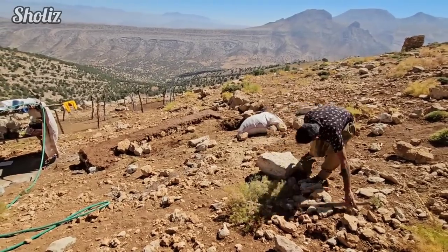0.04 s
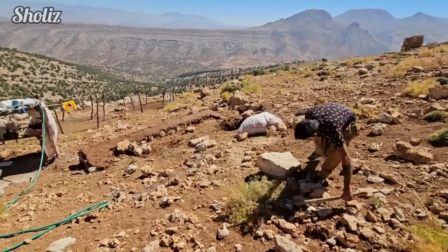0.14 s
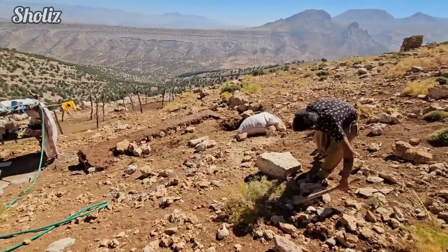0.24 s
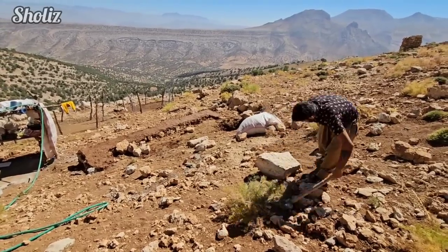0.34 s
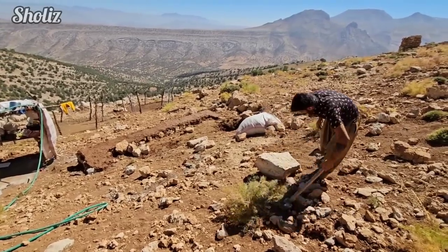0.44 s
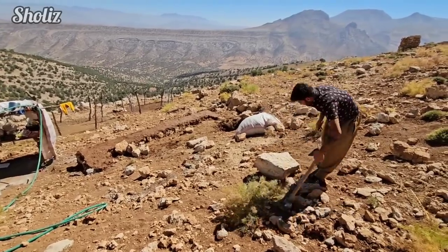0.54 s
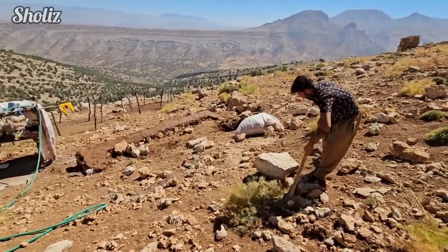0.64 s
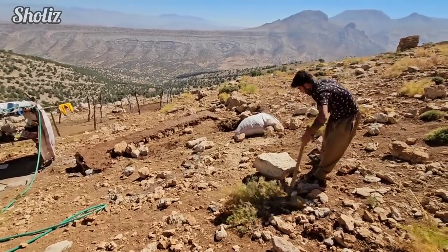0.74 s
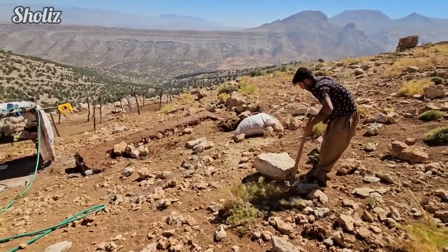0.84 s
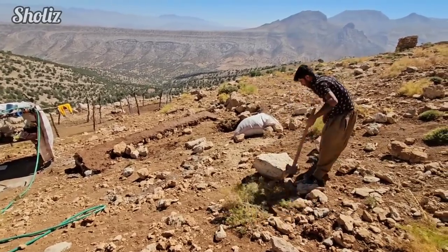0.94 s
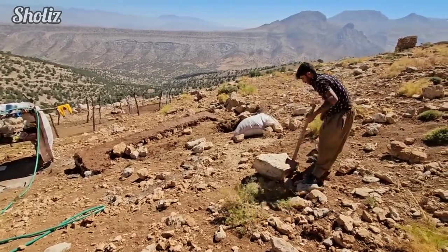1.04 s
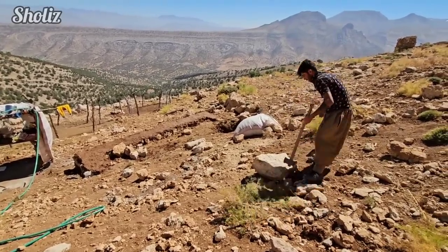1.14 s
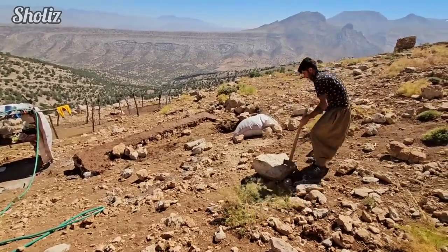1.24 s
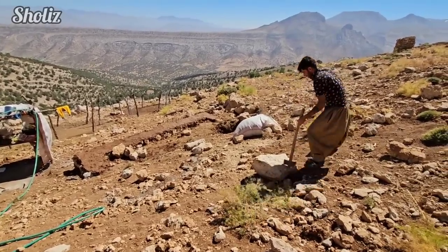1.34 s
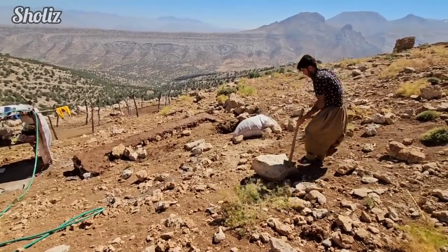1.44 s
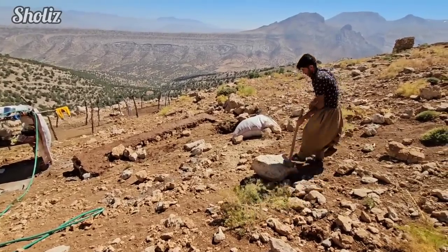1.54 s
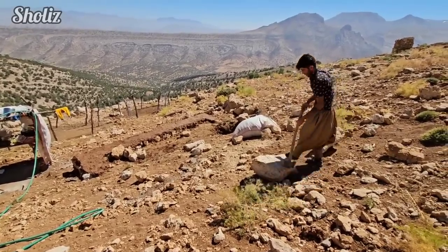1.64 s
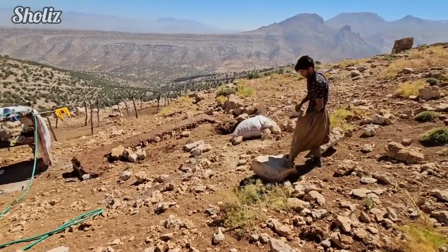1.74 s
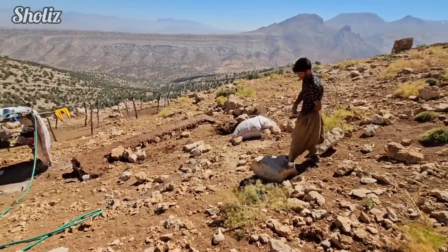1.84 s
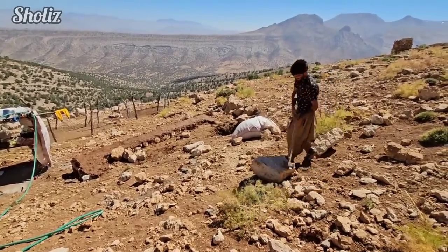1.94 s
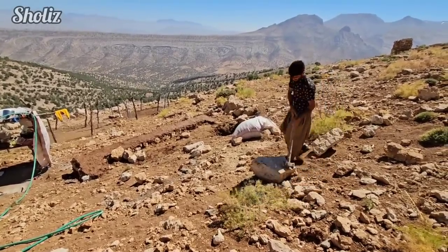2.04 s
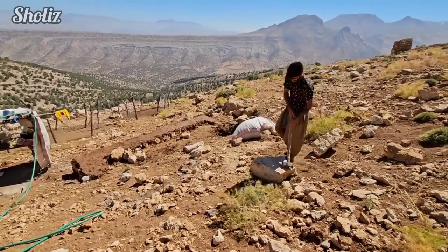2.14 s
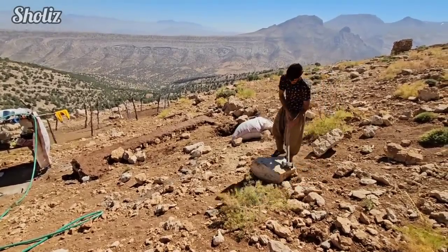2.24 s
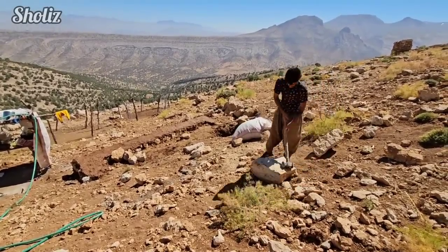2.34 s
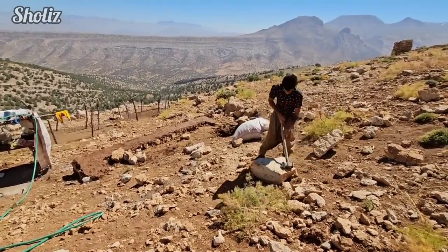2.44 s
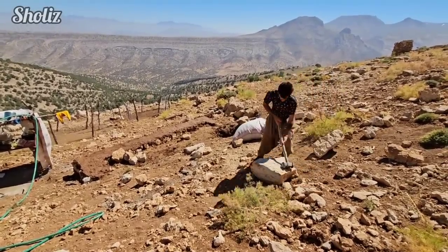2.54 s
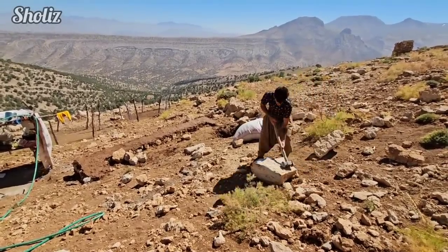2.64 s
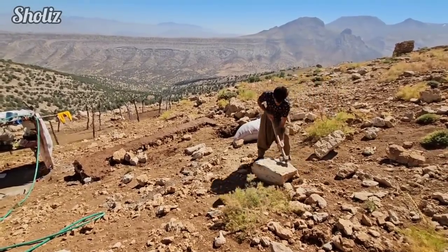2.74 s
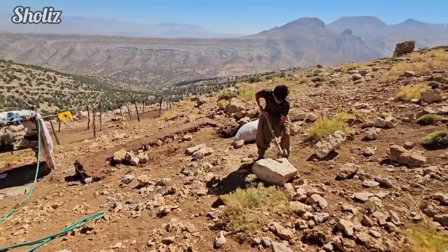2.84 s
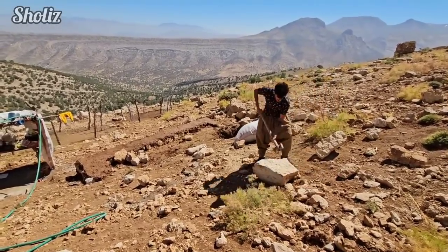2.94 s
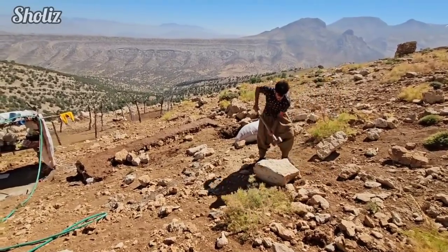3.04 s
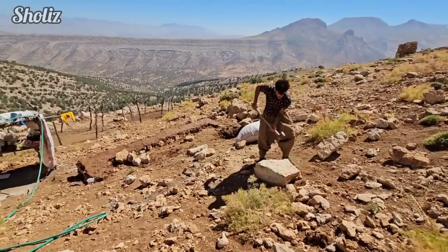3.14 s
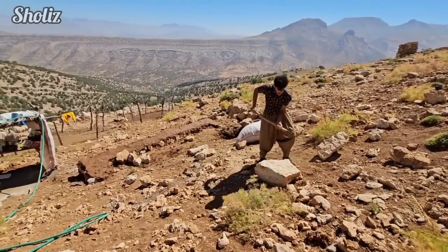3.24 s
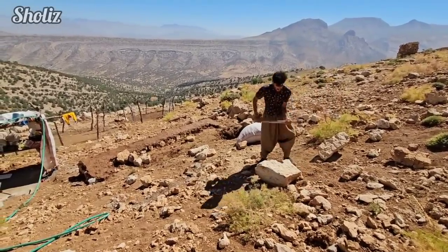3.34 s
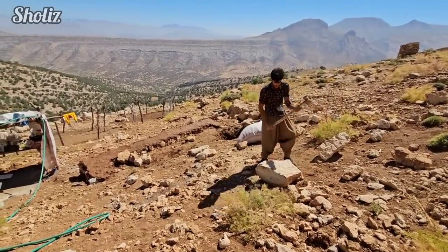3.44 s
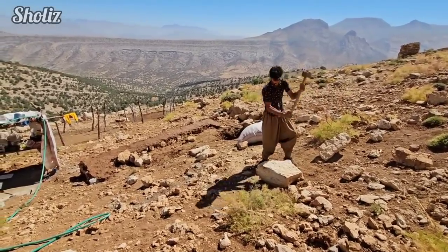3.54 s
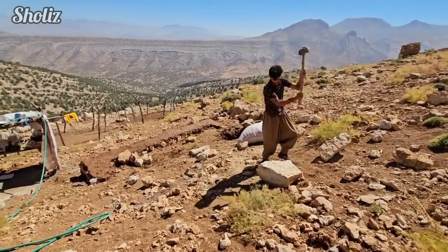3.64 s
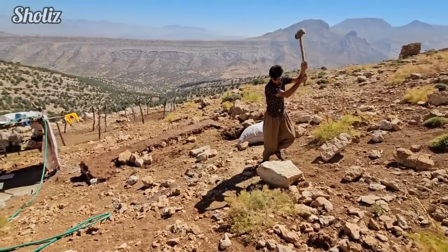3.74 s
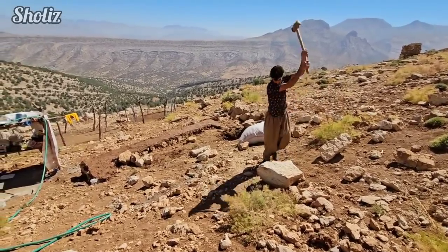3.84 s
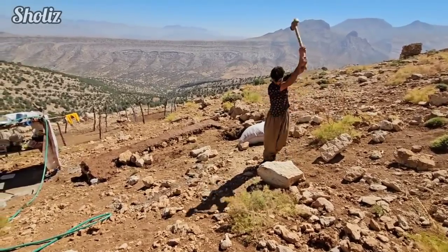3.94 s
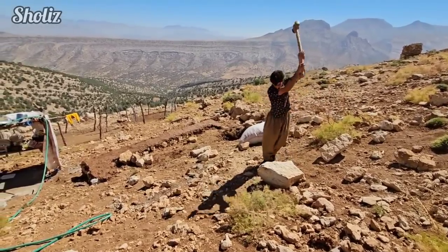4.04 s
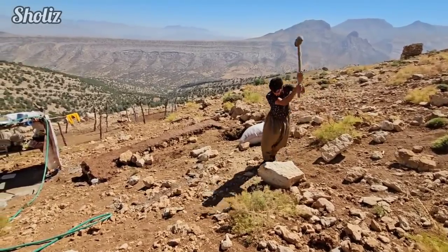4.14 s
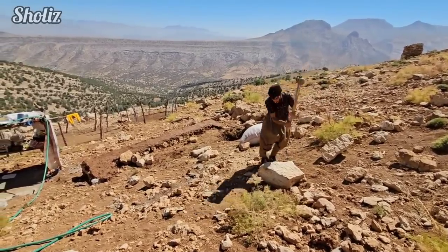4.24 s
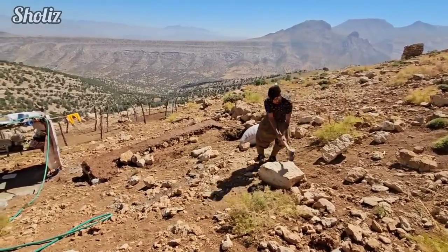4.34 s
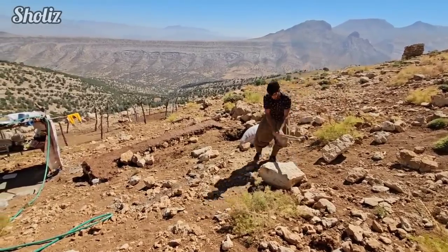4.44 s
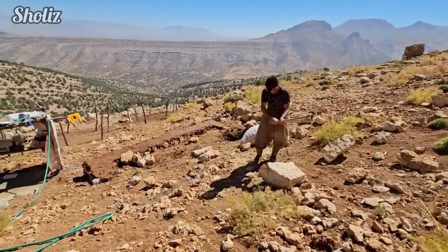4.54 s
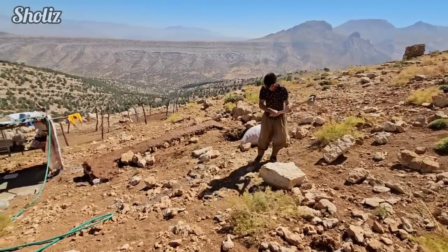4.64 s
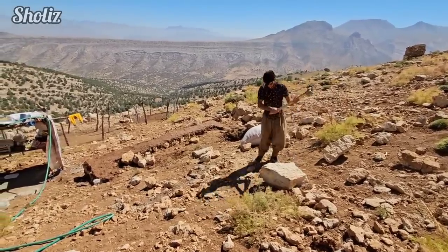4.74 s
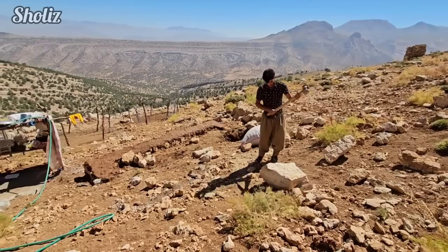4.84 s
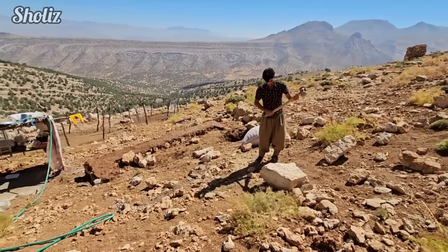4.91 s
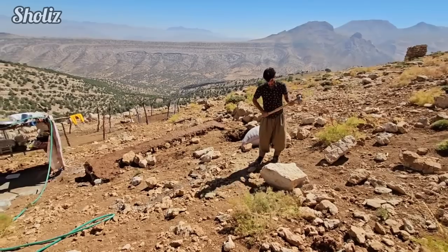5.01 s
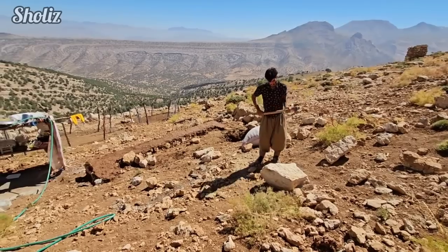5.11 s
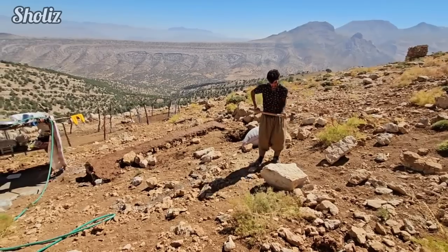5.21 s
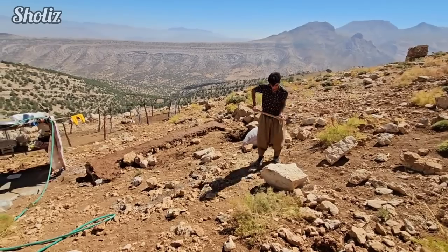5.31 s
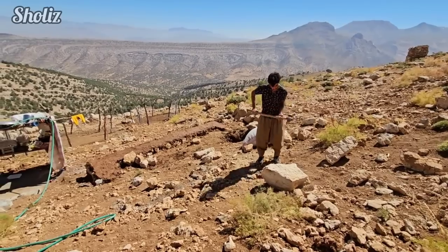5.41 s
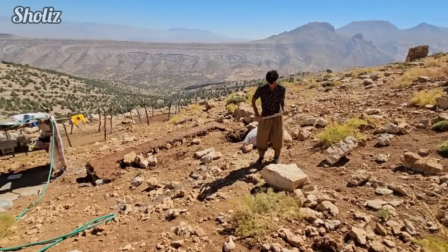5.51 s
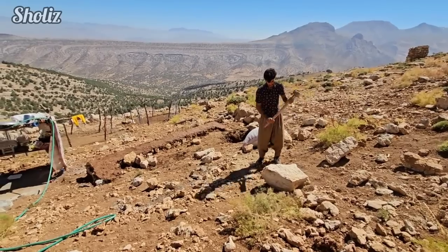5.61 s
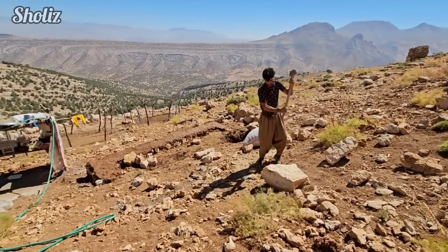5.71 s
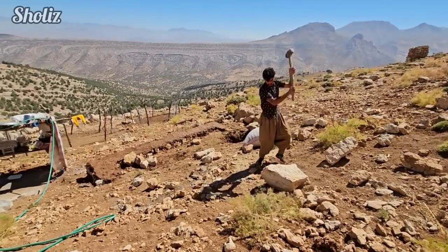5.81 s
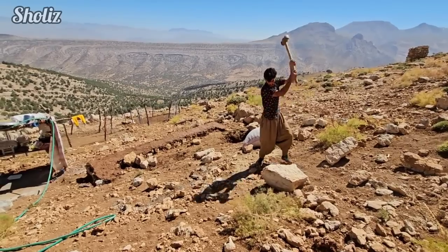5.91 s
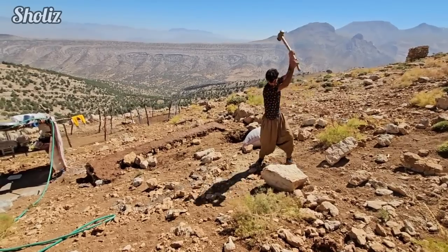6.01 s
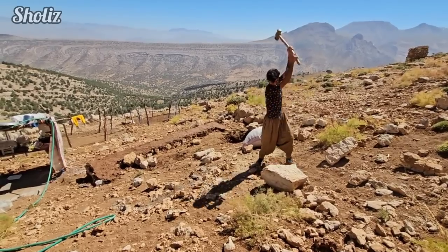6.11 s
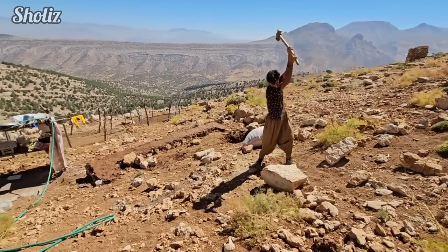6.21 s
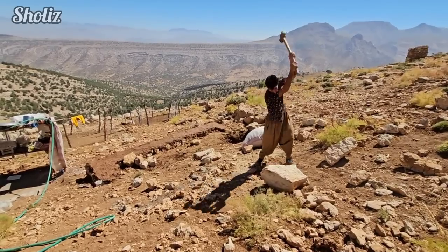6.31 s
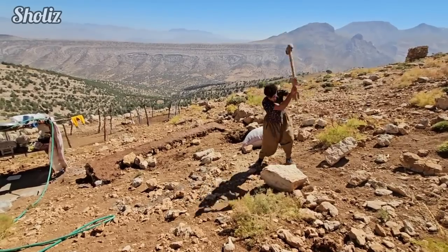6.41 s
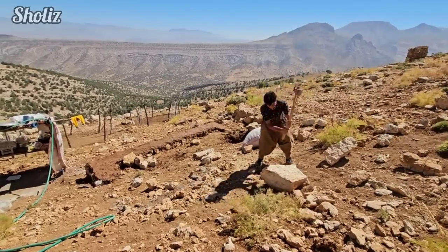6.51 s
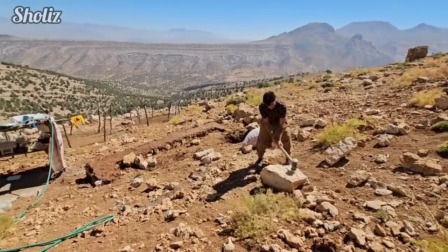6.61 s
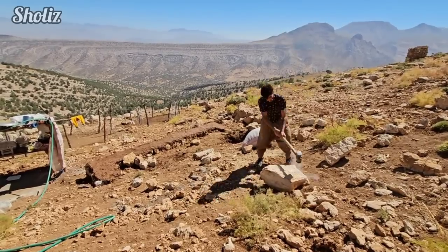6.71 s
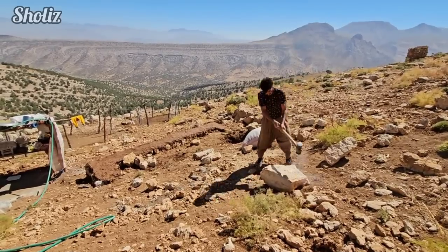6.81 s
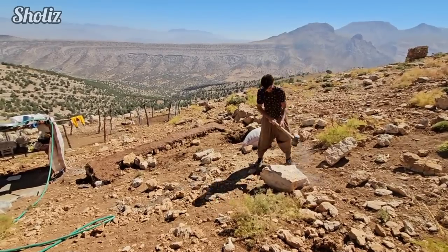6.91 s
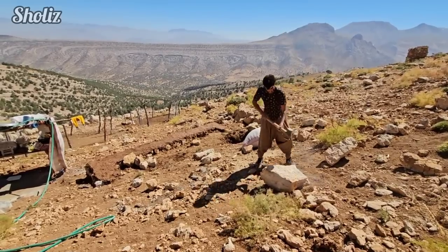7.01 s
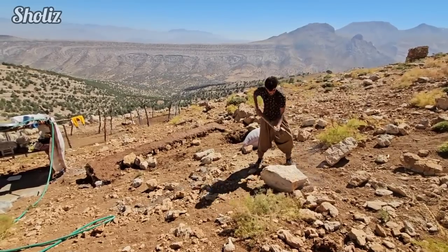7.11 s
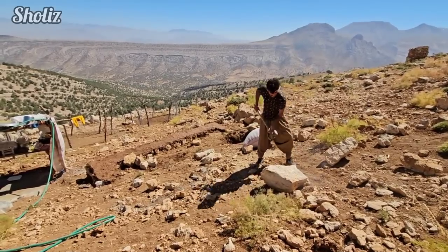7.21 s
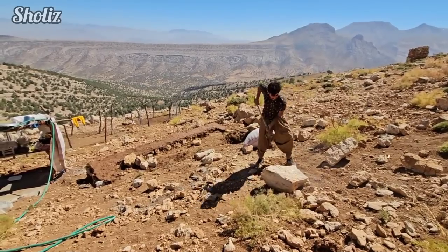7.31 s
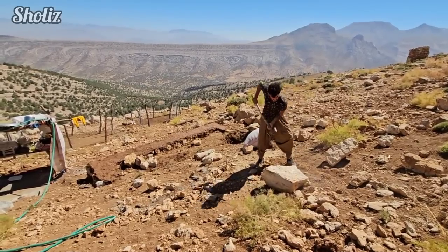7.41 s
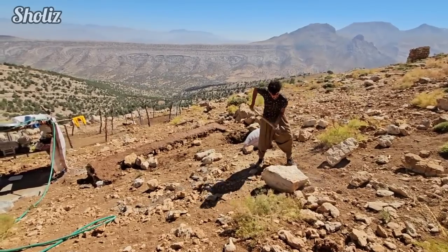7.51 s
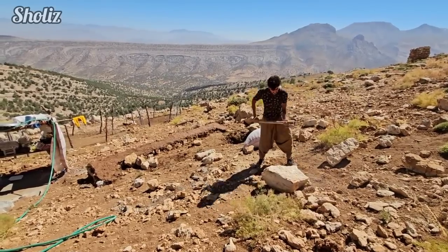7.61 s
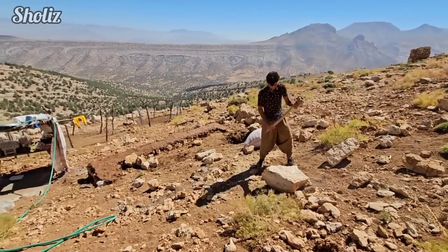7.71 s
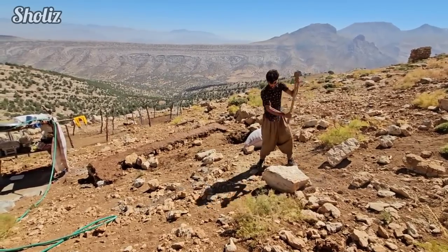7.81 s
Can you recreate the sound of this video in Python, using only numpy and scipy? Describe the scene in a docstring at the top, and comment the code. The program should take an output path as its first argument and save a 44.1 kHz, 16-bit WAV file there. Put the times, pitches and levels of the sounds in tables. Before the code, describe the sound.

On an open, stony hillside, wind rumbles unevenly on the microphone throughout, with occasional low bumps and a faint hiss in dry grass. From the start until about 3.5 seconds, feet shuffle over loose stones, which quietly crunch, grind and clack. A sledgehammer head knocks lightly on a boulder at 1.2 seconds and again at 2.7. At about 4.4 seconds a faint swish leads into a full blow: a loud, dry crack of rock, a thin high ring of steel, a short echo off the ground and a patter of grit. A few stones click afterwards, and the feet shift again between 5.3 and 6 seconds. A second, equally hard blow lands at 6.6 seconds, followed by small bright ticks of scattering chips. Wind continues until the end, near 8 seconds. A very faint, high arching whistle comes a few times, barely audible.

```python
"""A sledgehammer hits a boulder twice: a dry crack of rock, a thin ring of steel and a short wash of
echoes off the stony ground. Before he swings, a man shuffles over loose stones, which crunch, grind
and clack underfoot, and sets the hammer down on the rock. Around him is an open hillside: wind
buffets the microphone and hisses in dry grass, and now and then a faint high whistle arches overhead."""
import sys
import numpy as np
from scipy import signal
from scipy.fft import rfft, irfft
from scipy.io import wavfile
from scipy.ndimage import uniform_filter1d

SR = 44100
rng = np.random.default_rng(int(sys.argv[2]) if len(sys.argv) > 2 else 0)


def digitize_waveform(pressure):
    """Quantize a signal to 16-bit integers and store it at the path in sys.argv[1].

    Rows of a 2-D input are taken as channels; values are limited to [-1, 1].
    """
    field = np.atleast_2d(pressure).T
    bounded = np.clip(field, -1, 1)
    quanta = np.round(bounded * 32767).astype(np.int16)
    wavfile.write(sys.argv[1], SR, quanta)


N = 346626

# Steel meets rock, from light touches to full blows. Each row: start in seconds, force in dB,
# contact time in ms, then the levels of crushed grit, head ring, head clang and ground echo in dB.
BLOWS = [(1.2014, -18.5, 0.3, -19.5, -70, -68, -20), (1.2049, -43, .3, -12.5, -75, -68, -40),
         (2.612, -51, .5, -58, -76, -80, -50), (2.6929, -17.5, 0.97, -42, -61.5, -66, -29),
         (4.3542, -0.5, 0.059, 0.5, -34.5, -26, -1.5), (6.599, 1.5, 0.051, 2.5, -45, -25.5, -2),
         (6.6254, -12, 0.43, -16.5, -66, -46.5, -25)]
# The boulder's knock. Each row: pitch in Hz, level in dB, t60 in seconds, build-up as a share of t60.
ROCK_MODES = [(199, -22, 0.022, .05), (281, -10.5, 0.03, 0.47), (535, -12, 0.027, .03),
              (720, -10, 0.028, 0.18), (814, -8.5, 0.032, .7), (1003, -12.5, 0.016, 0.02),
              (1290, -8.5, 0.024, 0.17), (1394, 4, .017, 0.82), (1565, 7, 0.0094, 0.7),
              (1816, -12, 0.031, .39), (2060, -12, .027, 0.05), (2666, -10.5, 0.02, 0.77),
              (3024, -16.5, 0.015, .05), (3700, -28.5, 0.027, 0.19), (3950, -18.5, .014, .15)]
# The steel head. Each row: pitch in Hz, level in dB, t60 in seconds, 1 for clang or 0 for lasting ring.
HEAD_MODES = [(2005, -18.5, .45, 0), (5210, -8, 0.22, 0), (5130, 0, 0.076, 1), (5360, 1.5, 0.033, 1),
              (7170, 4.5, 0.44, 0), (8465, -9.5, .11, 1), (8270, -7.5, 0.15, 1), (8100, -12, 0.1, 1),
              (14290, -12.5, .17, 0)]
# Tone of the crushed grit and of the ground's echo. Each row: frequency in Hz, level in dB.
CRACK_EQ = [(1200, -5), (2000, 2), (3000, 1.5), (4300, -3), (5300, -1), (5850, -7), (6300, -1), (7400, -13),
            (8400, -1), (9500, -20), (11200, -2), (13000, -14), (14500, -13), (15600, -17)]
ECHO_EQ = [(150, -50), (250, -11), (729, -6), (978, -13), (1990, -8.5), (3960, -17), (5220, -14.5),
           (6770, -25), (7250, -13), (7640, -23.5), (8320, -19), (9890, -29), (15500, -28)]
# Bright ticks of chips and grit. Each row: start in seconds, level in dB.
CHIP_TICKS = [(0.036, -43), (.213, -49), (.768, -54), (.7996, -57), (2.156, -43), (2.175, -35),
              (2.206, -52), (2.231, -50), (2.261, -54), (4.535, -60), (4.56, -54), (4.645, -54),
              (4.964, -56), (5.2363, -55), (6.6335, -25), (6.692, -49), (6.738, -48), (6.7995, -46.5),
              (6.862, -56.5), (6.9222, -45), (6.9586, -50), (7.163, -58)]
# A foot or the hammer head shoves through gravel. Each row: start, swell and hold in seconds,
# then the levels of crunch, weight and fine grit in dB.
SHOVES = [(0.0, 0.00047, 0.0038, -48, -42.5, -55.5), (0.371, 0.034, 0.01, -54.5, -47, -61),
          (0.594, 0.0047, 0.0023, -67.5, -59.5, -57.5), (0.53, 0.03, 0.02, -80, -82, -68),
          (0.707, 0.014, 0.0068, -66, -71, -93), (0.799, 0.057, 0.044, -57.5, -59.5, -65.5),
          (0.948, 0.0075, 0.026, -52, -51, -68.5), (0.994, 0.022, 0.0073, -51, -49, -63),
          (1.245, 0.02, 0.008, -52.5, -58, -64), (1.283, 0.018, 0.022, -54, -50.5, -63.5),
          (1.331, 0.005, 0.033, -44, -48.5, -56), (1.537, 0.0022, 0.033, -59, -62.5, -59),
          (1.58, 0.027, 0.023, -60, -63, -61.5), (1.663, 0.0042, 0.073, -48, -51, -60),
          (1.79, 0.0072, .008, -62, -64, -86), (1.892, 0.0014, 0.002, -58, -58, -65),
          (1.928, 0.089, 0.027, -47.5, -51, -59.5), (2.042, .008, 0.017, -52.5, -78, -58.5),
          (2.106, 0.018, 0.047, -62.5, -94, -72.5), (2.228, 0.0026, 0.0024, -50, -57, -49.5),
          (2.269, 0.019, 0.11, -50, -56, -58), (2.422, 0.056, 0.087, -65, -57, -75),
          (2.528, 0.0065, 0.034, -52.5, -55, -59), (2.603, 0.019, 0.016, -50.5, -72, -57.5),
          (2.67, 0.0061, 0.066, -49.5, -76, -56), (2.809, 0.01, 0.012, -61, -67, -78),
          (2.901, 0.0071, 0.064, -56.5, -55.5, -68), (2.983, 0.013, 0.068, -50, -48, -59),
          (3.085, 0.063, 0.047, -55.5, -53.5, -74), (3.248, 0.0045, 0.031, -56.5, -54.5, -74),
          (3.293, 0.0046, 0.033, -48, -47, -60.5), (3.399, 0.023, 0.033, -64, -51, -78),
          (3.514, 0.0065, 0.005, -53, -46, -64), (4.425, .03, .1, -66.5, -70.5, -84),
          (5.343, 0.0064, 0.044, -83, -62, -95), (5.63, 0.0064, 0.035, -64, -55, -72),
          (5.845, 0.0037, 0.057, -69.5, -57.5, -74), (5.918, 0.0034, 0.043, -57, -49.5, -75),
          (6.92, .01, 0.037, -70, -70, -81)]
# Big stones, pebbles and grit. Each row: contacts per second, dry click in dB, ring in dB.
STONE_SIZES = [(244, 0.5, -1), (528.7, -5.5, -3), (1330, 1.5, -5)]
# The ring of jostled stones. Each row: pitch in Hz, level in dB, t60 in seconds.
GRAVEL_MODES = [(621, -9.5, 0.17), (705, -11.5, 0.037), (842, -2, 0.18), (1037, -9, 0.1),
                (1283, -5.5, 0.032), (1530, -0.5, 0.0094), (1728, -3.5, 0.098), (2050, -8.5, 0.011),
                (2526, -10, 0.12), (2887, -17, 0.057), (3540, -15, 0.028), (4376, -1.5, 0.019),
                (4750, -8.5, 0.027), (5170, -10.5, 0.023), (7310, -5.5, 0.017), (7960, -8, 0.011)]
# Tone of the gravel's dry clicks. Each row: frequency in Hz, level in dB.
GRAVEL_EQ = [(160, -55.5), (280, 41), (426, -8), (682, 12), (1230, -1.5), (1720, 3), (2490, -11.5),
             (3310, -11.5), (4110, -23), (5120, -37.5), (7160, -30.5), (8050, -42), (15500, -33)]
# One stone grinds under the sole. Each row: start and length in seconds, level in dB, pitch in Hz.
GRINDS = [(0.379, 0.038, -49, 375), (0.846, 0.092, -60.5, 1530), (0.95, 0.027, -52.5, 1314),
          (1.342, 0.085, -52.5, 1290), (1.59, 0.048, -61.5, 2146), (1.668, 0.053, -52, 1746),
          (2.0, 0.033, -49, 1490), (2.303, 0.11, -59.5, 2110), (2.535, 0.039, -61, 1970),
          (2.619, 0.025, -57, 2330), (2.716, 0.044, -80, 1720), (2.915, .02, -67, 1350),
          (3.037, 0.014, -59, 2060), (3.165, .025, -54, 940), (3.288, 0.02, -51.5, 1370),
          (3.423, 0.049, -65, 796)]
# The ring of a grinding stone. Each row: multiple of its pitch, level in dB.
GRIND_MODES = [(1.001, 2), (1.37, -16), (2.16, -20), (2.9, -27)]
# Loose stones knock together. Each row: start in seconds, level in dB, pitch in Hz, t60 in seconds,
# amount of dry snap in dB.
CLACKS = [(0.01, -40.5, 578, 0.095, -4), (0.376, -40, 730, 0.061, -8), (0.9581, -53, 2000, .03, -12),
          (1.0105, -37.5, 660, 0.08, 4), (1.3, -35, 735, 0.073, -11), (1.3415, -35, 1777, 0.029, -4),
          (1.3746, -45, 1430, .03, -7), (1.546, -42.5, 2000, 0.019, 11.5), (1.568, -49.5, 2500, .02, 10),
          (1.651, -39.5, 705, 0.055, -30), (1.668, -42, 1630, 0.069, 9), (1.772, -47, 614, 0.098, -13),
          (1.8957, -47, 2220, .02, 7.5), (2.0084, -41, 1510, .03, 1), (2.39, -44, 2050, .03, -10),
          (2.54, -46, 2090, 0.056, 15.5), (2.82, -62, 1660, .03, -5), (2.916, -41, 1317, .04, 4),
          (2.992, -44, 710, 0.042, -5), (3.01, -36, 866, 0.069, -12), (3.053, -44.5, 2080, .025, 5),
          (3.079, -39, 647, 0.047, -17), (3.175, -40.5, 875, 0.07, -16), (3.255, -39.5, 1250, 0.05, -11),
          (3.301, -35, 817, 0.07, -2), (3.528, -36, 837, 0.13, -26), (4.395, -35.5, 2070, .02, 1),
          (4.429, -41.5, 1950, .02, -7), (4.509, -39.5, 1310, 0.0066, -10), (4.529, -52.5, 2070, 0.13, -15),
          (4.56, -49.5, 600, 0.012, -9), (4.692, -52, 580, 0.016, -9), (5.349, -47, 697, 0.05, -22),
          (5.455, -68.5, 2900, .012, 0), (5.642, -42.5, 634, 0.08, 0), (5.8555, -47.5, 828, 0.04, 1.5),
          (5.92, -47, 750, 0.051, -6), (5.954, -55, 1730, .025, 9), (6.49, -40, 680, 0.016, -8),
          (6.923, -55, 1337, 0.04, -4)]
# A heel or the hammer head lands. Each row: start in seconds, level in dB, t60 in seconds.
THUDS = [(0.01, -43.5, 0.19), (0.391, -52.5, 0.49), (1.2, -29.5, 0.076), (5.639, -47, 0.27),
         (5.859, -49.5, 0.27), (5.924, -47.5, 0.21)]
# Brushed twigs and grass. Each row: peak time and half length in seconds, level in dB.
RUSTLES = [(0.412, 0.037, -66), (0.535, .08, -67), (0.81, 0.028, -66.5), (2.053, 0.056, -76),
           (2.726, 0.033, -78), (2.89, 0.036, -76), (3.154, .06, -83), (3.707, 0.056, -69.5),
           (6.36, 0.014, -70)]
# Single eddies on the microphone. Each row: centre and half length in seconds, level in dB, pitch in Hz.
BUFFETS = [(0.686, 0.035, -41, 57.5), (0.793, 0.013, -23.5, 71), (1.485, 0.021, -29, 47),
           (2.115, 0.011, -22.5, 73), (3.788, 0.0094, -39, 47), (4.266, 0.022, -24.5, 58.6),
           (4.59, 0.013, -23.5, 53), (5.763, 0.019, -25, 48), (7.628, 0.017, -21, 61.3)]
# Level rides for the wind rumble and, in three stretches, the grass hiss.
# Each row: time in seconds, level in dB.
GUST_LEVELS = [(0.0, -34.5), (0.35, -35), (0.44, -67), (0.5, -28.5), (0.55, -34.5), (0.81, -30),
               (0.87, -49.5), (1.02, -46.5), (1.1, -35.5), (1.24, -41), (1.44, -44), (1.5, -41.5),
               (1.75, -41), (1.9, -30.5), (1.97, -58), (2.1, -34), (2.5, -39.5), (3.0, -31.5), (3.06, -52),
               (3.19, -36), (3.55, -39), (3.8, -31.5), (4.29, -37.5), (4.53, -48.5), (4.6, -31.5),
               (4.71, -50.5), (4.85, -41), (5.01, -35), (5.62, -33.5), (5.71, -48), (5.77, -32),
               (5.89, -48.5), (5.98, -50), (6.08, -36.5), (6.45, -35), (6.55, -30), (6.63, -30.5),
               (6.7, -53.5), (6.9, -39), (7.11, -47.5), (7.24, -45), (7.28, -39.5), (7.36, -36),
               (7.43, -58), (7.5, -40), (7.64, -35), (7.82, -46), (7.86, -45)]
BREEZE_LEVELS = [
    [(0.0, -88), (0.6, -78), (0.85, -95), (0.99, -91), (1.93, -90.5), (2.19, -79.5), (2.4, -85.5),
     (3.59, -87.5), (3.71, -79), (3.77, -87), (3.97, -99), (4.2, -87)],
    [(4.95, -97.5), (5.246, -105), (5.636, -98), (5.878, -92), (6.012, -75), (6.132, -73.5), (6.39, -82),
     (6.5, -75.5)],
    [(6.83, -79.5), (6.98, -71), (7.12, -74.5), (7.19, -92.5), (7.27, -75.5), (7.57, -79), (7.62, -89),
     (7.68, -75), (7.86, -79)],
]
# Soft rushes of air over the slope. Each row: peak time and half length in seconds, level in dB.
RUSHES = [(3.848, 0.041, -64), (5.169, 0.037, -71), (5.442, 0.086, -77.5), (6.313, 0.31, -81.5),
          (6.896, 0.11, -70), (7.43, 0.063, -70.5), (7.821, 0.05, -70)]
# Tone of the rumble, grass hiss, rushes and steady air bed. Each row: frequency in Hz, level in dB.
RUMBLE_EQ = [(12, -37.5), (20, -4), (48, 0.5), (75, -1), (131, -13.5), (236, -27.5), (341, -40),
             (433, -53.5), (732, -49), (900, -65), (1170, -88), (1980, -120)]
GRASS_EQ = [(290, -32.5), (500, -8.5), (687, -4), (960, -19.5), (1290, -10), (1550, -13), (1950, -6.5),
            (2350, -14), (3500, -15), (4550, -9), (5300, -17), (7210, -9.5), (8150, -18.5), (9080, -16),
            (9960, -19.5), (11300, -14), (15800, -21.5)]
RUSH_EQ = [(300, -12.5), (500, -6), (700, 6.5), (960, -5), (1350, 0), (1650, -8.5), (2000, -7), (2500, -16),
           (4000, -24), (9000, -51.5)]
AIR_EQ = [(180, -33.5), (300, -4.5), (432, -15.5), (711, -14), (853, -18.5), (1890, -21.5), (8410, -42.5),
          (11200, -29.5), (15800, -38.5)]
# Thin whistles. Each row: top of the arch and half length in seconds, top pitch in Hz, level in dB.
WHISTLES = [(.47, .2, 11750, -74.5), (3.27, .23, 11220, -80.5), (3.84, .085, 9150, -84),
            (6.095, .1, 12350, -75)]
# The swish of a full swing. Each row: time of the blow in seconds, level at the blow in dB.
SWINGS = [(4.354, -59), (6.599, -69)]


def boulder():
    """A blow rings the heavily damped rock and crushes its surface for a few milliseconds."""
    starts, force_db, contact_ms, grit_db, *_ = np.transpose(BLOWS)
    force = np.zeros(N)
    for start, db, ms in zip(starts, force_db, contact_ms):
        progress = np.minimum(np.arange(1, 200) / (ms * SR / 1000), 1)
        push = np.sin(np.pi * progress)  # a longer contact is duller
        force[round(start * SR):][:len(push)] += from_db(db) * push / push.sum()
    low, high = np.zeros((2, N))
    for k, (hz, db, t60, build_up) in enumerate(ROCK_MODES):
        # each mode builds as the shock spreads; neighbours swing in opposite senses
        mode = ring(force, hz, t60) - ring(force, hz, t60 * build_up)
        register = low if hz < 1150 else high
        register += (-1) ** k * from_db(db) * mode
    body = place(low, left_lead_ms=-0.24, pan_db=2) + place(high, left_lead_ms=-0.095, pan_db=-3.8)
    grit = strikes(starts, grit_db)
    crushing = fade(grit, t60=0.022) - fade(grit, t60=0.004)
    crack = colour(crushing * stereo_noise(alike=0.022), CRACK_EQ)
    return body + from_db(-10) * crack


def hammer_head():
    """The steel rings as it rebounds; its motion lifts the pitch, which beats against the reflection."""
    rebound_m_per_s, slowing_s, sound_m_per_s = 4.1, 0.17, 343  # rebound after a 0 dB blow
    out, t = np.zeros((2, N + SR)), np.arange(SR) / SR
    stereo_phase = np.array([[0], [0.2]])
    for start, force_db, _, _, ring_db, clang_db, _ in BLOWS:
        travel_m = rebound_m_per_s * from_db(force_db) * slowing_s * (1 - np.exp(-t / slowing_s))
        doppler_t = t + travel_m / sound_m_per_s
        for hz, db, t60, is_clang in HEAD_MODES:
            # the ring swells as the head lifts clear of the rock
            envelope = from_db(-60 * t / t60) - from_db(-60 * t / (0.1 * t60))
            direct = np.sin(2 * np.pi * (hz * doppler_t + rng.random() + stereo_phase))
            off_ground = from_db(-6) * np.sin(2 * np.pi * (hz * t + rng.random((2, 1))))
            level = from_db(db + (clang_db if is_clang else ring_db))
            out[:, round(start * SR):][:, :SR] += level * envelope * (direct + off_ground)
    flutter_db = 2.6 * np.array([drift(110), drift(110)])  # the head turns
    pan_db = np.array([[-4.7], [4.7]])
    return out[:, :N] * from_db(pan_db + flutter_db)


def ground_echo():
    """Near stones slap each blow back, the far slope answers faintly, grit patters and chips spray."""
    starts, *_, echo_db = np.transpose(BLOWS)
    clicks = strikes(starts + 0.0018, echo_db)
    slap = fade(clicks, t60=0.21) - 0.52 * fade(clicks, t60=0.017)
    near = from_db(-26) * stereo_noise(alike=0.042) * slap
    far = from_db(-46.5) * band(stereo_noise(alike=0) * fade(clicks, t60=0.26), 400, 5000, order=1)
    patter = np.array([grains(170, spread_db=4.5) for side in range(2)]) * fade(clicks, t60=0.5)
    spray = np.array([grains(260, spread_db=4.5) for side in range(2)]) * fade(clicks, t60=0.9)
    debris = from_db(-43.5) * band(patter, 1000, 4500) + from_db(-60) * band(spray, 9900, 14000)
    return colour(near + far, ECHO_EQ) + debris


def swing():
    """A soft, fluttering swish grows with the speed of the head and cuts off at the blow."""
    t, rise_db_per_s = np.arange(N) / SR, 119.5
    level = sum((t < hit) * from_db(db - rise_db_per_s * np.abs(hit - t)) for hit, db in SWINGS)
    swish = band(stereo_noise(alike=0.54), 500, 1250, order=3)
    return level * rms_one(swish * from_db(2.5 * drift(70)))


def chips():
    """Small hard bits give a bright tick."""
    starts, db = np.transpose(CHIP_TICKS)
    burst = stereo_noise(alike=0.1) * fade(strikes(starts, db - 3), t60=0.03)
    return band(burst, 10000, 15500) + from_db(-9.5) * band(burst, 2000, 9000)


def shove_envelopes():
    """Crunch, weight and grit levels: each shove swells, holds, stops and leaves the stones settling."""
    swell_db, release_db_per_s = 10, 512
    settle_db, settle_db_per_s = -15.5, 139
    power, t = np.zeros((3, N + SR)), np.arange(SR) / SR
    for start, swell_s, hold_s, *levels_db in SHOVES:
        after = np.maximum(t - swell_s - hold_s, 0)
        swell = from_db(swell_db * np.minimum(t / swell_s - 1, 0))
        tail = from_db(np.maximum(-release_db_per_s * after, settle_db - settle_db_per_s * after))
        power[:, round(start * SR):][:, :SR] += np.outer(from_db(levels_db), swell * tail) ** 2
    return np.sqrt(power[:, :N])


def gravel():
    """Underfoot, big stones grind low, pebbles crunch and grit crackles, all with a short ring."""
    crunch, weight, grit = shove_envelopes()
    n = np.arange(N)
    edges_hz = (480, 1100, 4000, 15000)
    slip = from_db(3 * (drift(130) - 0.2))  # the load catches and gives way
    direct, scattered = 0, np.zeros((2, N))
    layers = zip((weight, crunch, grit), STONE_SIZES, edges_hz, edges_hz[1:])
    for level, (per_s, click_db, ring_db), low_hz, high_hz in layers:
        contacts = grains(per_s, spread_db=4.5)
        rung = np.zeros((2, N))
        for k, (hz, db, t60) in enumerate(GRAVEL_MODES):
            if low_hz <= hz < high_hz:
                shifted = np.roll(contacts, rng.integers(N))
                rung[k % 2] += from_db(db + ring_db) * rms_one(ring(shifted, hz, t60))
        # the sole keeps finding other stones, a little larger or smaller
        stone = np.cumsum(rng.random(N) < 28 / SR)
        speeds = 1 + 0.2 * rng.uniform(-1, 1, (2, stone[-1] + 1))[:, stone]
        repitched = [np.interp(np.cumsum(speed) % N, n, side) for speed, side in zip(speeds, rung)]
        rung = level * slip * np.array(repitched)
        clicks = rms_one(band(colour(contacts, GRAVEL_EQ), low_hz, high_hz, order=3))
        direct += from_db(click_db) * level * slip * clicks + rung.sum(axis=0)
        scattered += np.roll(rung, round(0.0037 * SR), axis=1)
    out = place(direct, left_lead_ms=0.44, pan_db=1.5) + from_db(4) * scattered
    return from_db(-1.8) * band(out, 268, 20000)  # small stones radiate little bass


def grinding_stones():
    """A trapped stone sticks and slips; the slips keep it ringing and its pitch glides steadily up or down as
    it grinds."""
    t60, slips_per_s, glide_share = 0.08, 350, 0.029
    out, size = np.zeros(N + SR), SR // 4
    n = np.arange(size)
    for start, length_s, db, hz in GRINDS:
        progress = np.minimum(n / SR / length_s, 1)
        load = np.sin(np.pi * progress) ** 0.5
        slips = load * rng.standard_normal(size) * (0.08 + (rng.random(size) < slips_per_s / SR))
        rung = sum(from_db(mode_db) * rms_one(ring(slips, hz * ratio, t60 / ratio))
                   for ratio, mode_db in GRIND_MODES)
        speed = 1 + glide_share * rng.choice([-1, 1]) * (progress - 0.5)
        level = from_db(db) * np.sqrt(length_s * SR / size)
        out[round(start * SR):][:size] += level * np.interp(np.cumsum(speed), n, rung)
    return from_db(1) * place(out[:N], left_lead_ms=0.46, pan_db=4.5)


def loose_stones():
    """A tipped stone snaps, chatters briefly and rings in a few inharmonic modes."""
    out, size = np.zeros(N + SR), SR // 4
    t = np.arange(size) / SR
    for start, db, hz, t60, snap_db in CLACKS:
        chatter = rng.standard_normal(size) * np.exp(-t / 0.0077)
        push = (t == 0) + 0.25 * chatter
        rung = sum(from_db(-6 * k) * ring(push, hz * ratio, t60 / ratio)
                   for k, ratio in enumerate((1, 1.53, 2.3)))
        body = band(rung, 0.66 * hz, 12000)
        snap = band(chatter, 820, 4300)
        clack = body / np.abs(body).max() + from_db(snap_db - 5.5) * snap / np.abs(snap).max()
        out[round(start * SR):][:size] += from_db(db) * clack
    return place(out[:N], left_lead_ms=0.453, pan_db=5.5)


def thuds():
    """A weight landing on packed earth gives a dull, short thud."""
    envelope = sum(fade(strikes([start], db + 19.5), t60) for start, db, t60 in THUDS)
    return place(band(envelope * rng.standard_normal(N), 170, 413), left_lead_ms=0.41, pan_db=-4)


def dry_brush():
    """Brushed stalks give a fine, bright crackle."""
    crackle = np.array([grains(2500, spread_db=5.5) for side in range(2)])
    return swells(RUSTLES, fade_db=12.5) * rms_one(band(crackle, 8800, 17200))


def buffets():
    """An eddy hits the microphone: a few lumpy swings of pressure, with a little flutter on top."""
    t, out = np.arange(N) / SR, np.zeros((2, N))
    eddies = stereo_noise(alike=0.93)
    flutter = rms_one(band(stereo_noise(alike=0.12), 106, 223, order=4))
    for centre, half_s, db, hz in BUFFETS:
        now = np.abs(t - centre) < 3 * half_s
        swell = np.exp(-0.5 * ((t[now] - centre) / half_s) ** 2)
        pressure = band(eddies, 0.57 * hz, 1.318 * hz, order=3)[:, now]
        thump = rms_one(pressure * swell) * np.sqrt(np.mean(swell ** 2))
        out[:, now] += from_db(db - 2.5) * (thump + from_db(-19) * flutter[:, now] * swell)
    return out


def wind():
    """Lumpy pressure on the microphone, hiss in the grass and far rushes over a steady bed of air."""
    rumble = colour(stereo_noise(alike=0.6), RUMBLE_EQ)
    # even out the rumble so that the gusts shape its level
    rumble /= np.sqrt(uniform_filter1d(np.mean(rumble ** 2, axis=0), size=SR // 12))
    trim_db = np.array([[-0.61], [0.07]])
    rumble *= from_db(level_ride(GUST_LEVELS) + trim_db + 3.8 * drift(35))
    breeze_db = level_ride(np.vstack(BREEZE_LEVELS)) + 7.5
    grass = colour(stereo_noise(alike=0.088), GRASS_EQ) * from_db(breeze_db + 1.7 * drift(27))
    flutter = from_db(3.5 * drift(70))
    rush = colour(stereo_noise(alike=0.17), RUSH_EQ) * swells(RUSHES, fade_db=2.5) * flutter
    air = from_db(-76) * colour(stereo_noise(alike=0.1), AIR_EQ)
    return rumble + grass + rush + air


def whistle():
    """A faint, very high tone glides in wavering arches, loudest on the way down."""
    sag_share, fade_db, late_half_lengths = 0.085, 17, 0.34
    t, out = np.arange(N) / SR, np.zeros(N)
    waver = 1 + 0.012 * drift(400) + 0.007 * drift(25)
    flicker = from_db(4.5 * drift(45) - 1)
    for top_s, half_s, top_hz, db in WHISTLES:
        now = np.abs(t - top_s) < 2 * half_s
        along = (t[now] - top_s) / half_s
        hz = top_hz * (1 - sag_share * along ** 2) * waver[now]
        level = from_db(db - fade_db * (along - late_half_lengths) ** 4)
        out[now] += level * np.sin(2 * np.pi * np.cumsum(hz) / SR)
    return place(out * flicker, left_lead_ms=0, pan_db=2)


def from_db(db):
    """Decibels to gain."""
    return np.exp(np.asarray(db) * (np.log(10) / 20))


def rms_one(x):
    """Scale to unit power."""
    return x / np.sqrt(np.mean(x ** 2) + 1e-20)


def level_ride(rows):
    """Join points of time and level by straight lines."""
    return np.interp(np.arange(N) / SR, *np.transpose(rows))


def swells(rows, fade_db):
    """Bell-shaped envelopes, each down by fade_db half a length from its peak."""
    t = np.arange(N) / SR
    return sum(from_db(db - fade_db * ((t - peak_s) / half_s) ** 2) for peak_s, half_s, db in rows)


def band(x, low_hz, high_hz, order=2):
    """Causal band-pass."""
    sos = signal.butter(order, [low_hz, high_hz], "band", fs=SR, output="sos")
    return signal.sosfilt(sos, x + 1e-18)


def colour(x, eq):
    """Minimum-phase EQ that keeps the power of white noise."""
    size = 8192
    hz, db = np.transpose(eq)
    grid = np.maximum(np.fft.rfftfreq(size, 1 / SR), 1)
    low_cut = np.minimum(grid / hz[0], 1) ** 3 + 1e-4
    gain = rms_one(from_db(np.interp(np.log(grid), np.log(hz), db)) * low_cut)
    causal_fold = np.r_[1, np.full(size // 2 - 1, 2), 1, np.zeros(size // 2 - 1)]
    cepstrum = irfft(np.log(gain)) * causal_fold
    impulse = irfft(np.exp(rfft(cepstrum)))
    return signal.oaconvolve(np.atleast_2d(x), impulse[None], axes=1)[:, :x.shape[-1]]


def drift(per_s):
    """A random wander through points of spread 1."""
    knots = rng.standard_normal(4000)
    return np.interp(np.arange(N) / SR * per_s, np.arange(len(knots)), knots)


def ring(clicks, hz, t60):
    """A unit click sets a sine of height 1 ringing."""
    decay, step = from_db(-60 / (t60 * SR)), 2 * np.pi * hz / SR
    return signal.lfilter([0, np.sin(step)], [1, -2 * decay * np.cos(step), decay ** 2], clicks + 1e-18)


def strikes(times, levels_db):
    """One click for each event."""
    out = np.zeros(N)
    out[np.round(np.asarray(times) * SR).astype(int)] = from_db(levels_db)
    return out


def fade(clicks, t60):
    """An envelope that jumps at each click and dies away."""
    return signal.lfilter([1], [1, -from_db(-60 / (t60 * SR))], clicks + 1e-18)


def place(x, left_lead_ms, pan_db):
    """Place a source in stereo by time and level; positive values lean left."""
    n = np.arange(N)
    shift = left_lead_ms * SR / 2000
    return np.array([np.interp(n + side * shift, n, np.ravel(x)) * from_db(side * pan_db / 2)
                     for side in (1, -1)])


def stereo_noise(alike):
    """White noise in two channels with the given correlation."""
    mid, side = rng.standard_normal((2, N))
    return np.sqrt((1 + alike) / 2) * mid + np.sqrt((1 - alike) / 2) * side * np.array([[1], [-1]])


def grains(per_s, spread_db):
    """Random clicks of uneven size, at unit power."""
    sizes = from_db(spread_db * np.minimum(rng.exponential(1, N), 4)) * rng.choice([-1, 1], N)
    return rms_one(sizes * (rng.random(N) < per_s / SR))


def scene():
    """Hammer up front, footwork under it, whistle and wind around them."""
    hammer = swing() + boulder() + hammer_head() + ground_echo()
    feet = gravel() + grinding_stones() + loose_stones() + thuds() + dry_brush()
    return hammer + feet + chips() + whistle() + wind() + buffets()


def record(dry):
    """A soft clip rounds the hardest peaks, and a steep low-pass cuts the very top."""
    ceiling, cutoff_hz = 0.95, 15900
    rounded = dry / (1 + (dry / ceiling) ** 4) ** (1 / 4)
    return signal.sosfilt(signal.ellip(10, 0.2, 80, cutoff_hz, fs=SR, output="sos"), rounded)


dry = scene()
out = record(dry)
digitize_waveform(out)
```